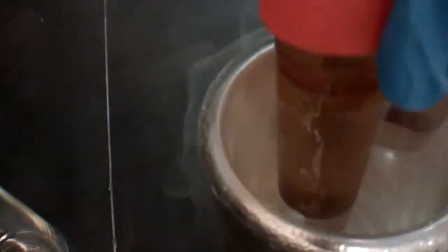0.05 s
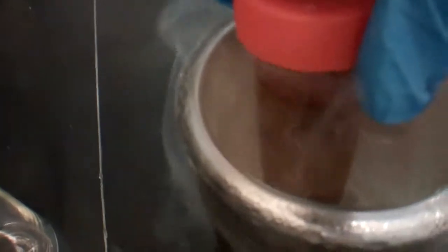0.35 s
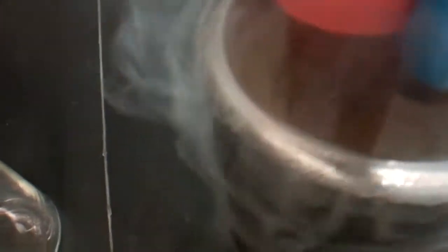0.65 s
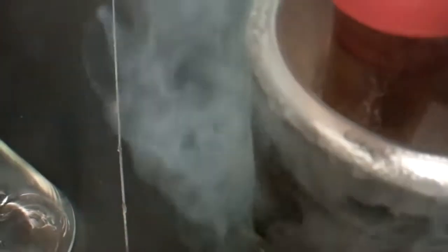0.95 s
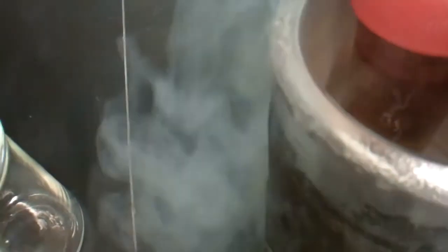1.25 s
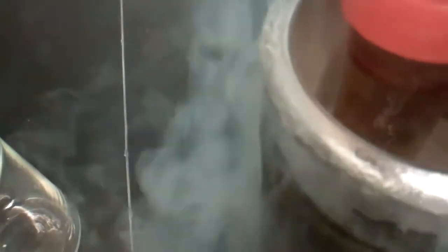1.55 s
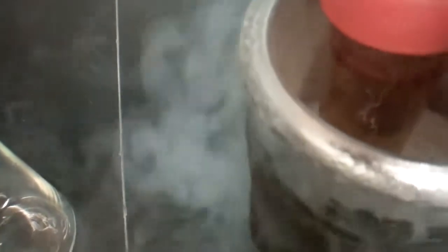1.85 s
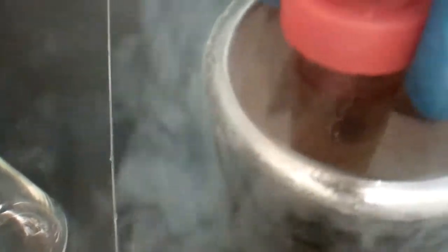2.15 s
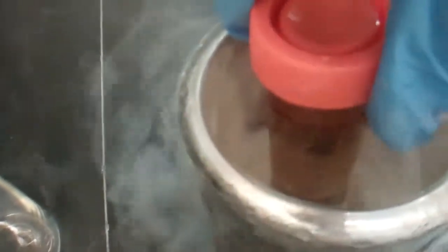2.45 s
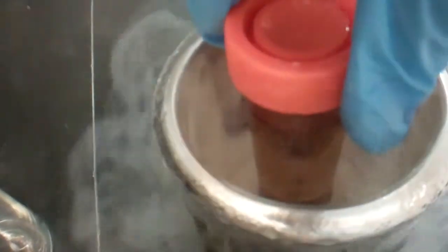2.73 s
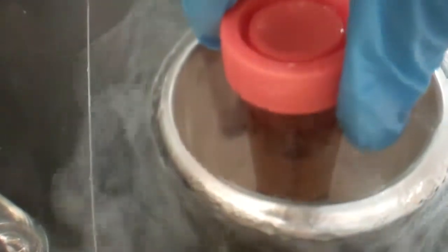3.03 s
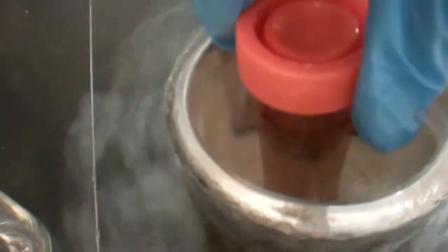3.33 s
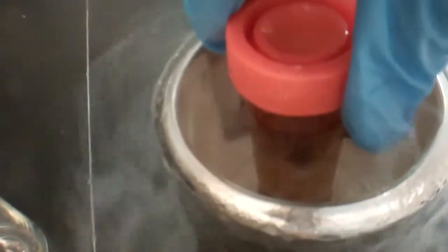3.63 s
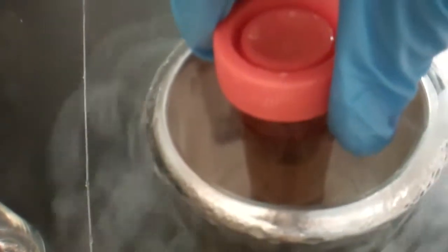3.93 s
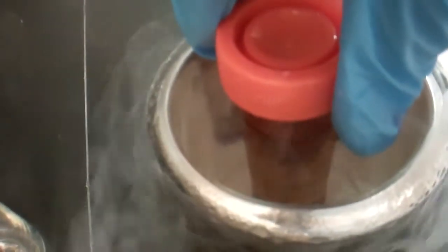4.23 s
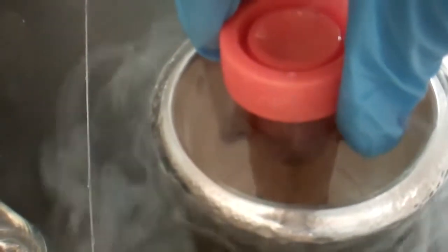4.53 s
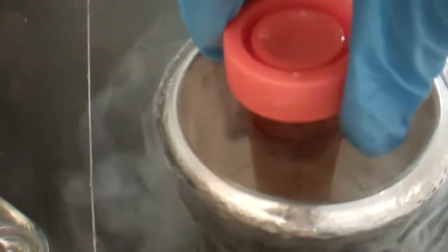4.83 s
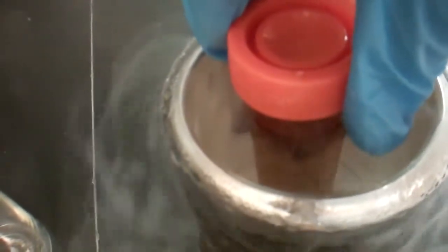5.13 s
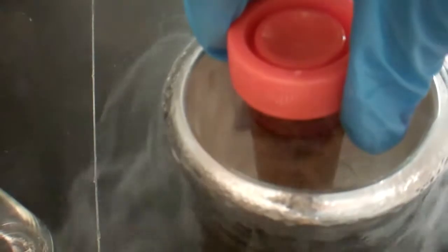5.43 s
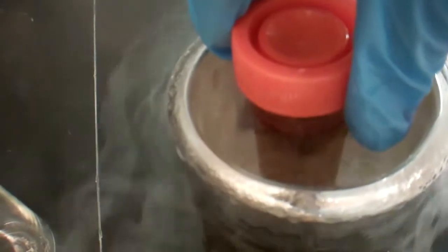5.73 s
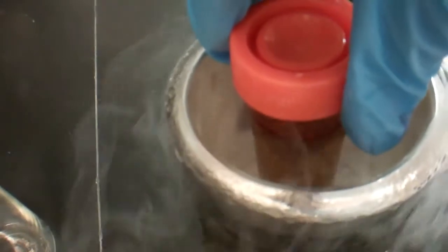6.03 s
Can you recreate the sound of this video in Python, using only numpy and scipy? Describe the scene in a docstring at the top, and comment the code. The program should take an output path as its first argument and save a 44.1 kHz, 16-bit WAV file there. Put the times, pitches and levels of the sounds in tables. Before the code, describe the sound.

Liquid nitrogen boils around a warm plastic tube in a steel flask, hissing, gurgling and spitting, then calming over a machine buzz.

```python
"""A machine buzzes at mains frequency over fan noise in a laboratory; the background drops almost at once. A
warm plastic tube enters a steel vacuum flask of liquid nitrogen and squeals thinly on contact. The liquid boils
against it: vapour rushes, sizzles, spits and sounds the flask's air column. The boiling calms as the tube
cools. After two seconds the background level comes back up, and a softer hiss goes on to the end."""
import sys
import numpy as np
from scipy.fft import rfft, irfft
from scipy.io import wavfile
from scipy.ndimage import uniform_filter1d

SR = 44100
rng = np.random.default_rng(int(sys.argv[2]) if len(sys.argv) > 2 else 0)


def dump(signal):
    """Clip the signal to [-1, 1] and save it as 16-bit WAV at the path in sys.argv[1]."""
    limited = np.clip(np.atleast_2d(signal).T, -1, 1)
    pcm = np.round(limited * 32767).astype(np.int16)
    wavfile.write(sys.argv[1], SR, pcm)


N = 272538
TIME, FREQS = np.arange(N) / SR, np.fft.rfftfreq(N, 1 / SR)
MAINS_HZ, CUTOFF_HZ = 59.9685, 14180
SPURT_SPRAY = 0.31   # share of a spurt's dB that goes to the fine spray only

# Direction of machine and fans. Each row: frequency in Hz, left minus right in dB.
ROOM_PAN = [(60, -7), (120, -6), (260, -5), (700, -6), (1300, -3), (2400, 3), (4400, -1.5), (9000, 0.5),
            (14000, 1.5)]


def from_db(db):
    """Decibels to gain."""
    return 10 ** (np.asarray(db) / 20)


def rms_one(x):
    """Scale to unit power."""
    return x / np.sqrt(np.mean(x ** 2) + 1e-20)


def in_time(rows):
    """Each value column of a time table, at every sample."""
    times_s, *columns = np.transpose(rows)
    return [np.interp(TIME, times_s, column) for column in columns]


def at_hz(points, hz):
    """Read a table on a log-frequency axis."""
    points_hz, values = np.transpose(points)
    return np.interp(np.log(hz + 1e-9), np.log(points_hz), values)


def ramp(start_s, length_s):
    """Linear rise from 0 to 1."""
    return np.clip((TIME - start_s) / length_s, 0, 1)


def swell(centre_s, half_s):
    """Gaussian rise to 1 and back."""
    return np.exp(-((TIME - centre_s) / half_s) ** 2)


def drift(rate_hz):
    """Random wander, mostly below rate_hz; rms 1."""
    size = 8192
    hz = np.fft.rfftfreq(size, N / SR / size)
    slow = irfft(rfft(rng.standard_normal(size)) / (1 + (hz / rate_hz) ** 2))
    return np.interp(np.arange(N) * size / N, np.arange(size), rms_one(slow))


def flutter(rate_hz, longest_s=0.36):
    """Drift without its slow swings; rms 1."""
    wander = drift(rate_hz)
    return rms_one(wander - uniform_filter1d(wander, int(longest_s * SR)))


def pan(left_db):
    """Left and right gains for a level difference."""
    gains = from_db(np.array([[.5], [-.5]]) * left_db)
    return gains / np.sqrt(np.mean(gains ** 2, axis=0))


def from_flask(x):
    """Mono to stereo, arriving slightly later on the left."""
    return np.array([np.roll(x, SR // 9000), x])


def resonance(hz, width_hz):
    """Response of one damped mode; peak 1."""
    return 1j * FREQS * width_hz / (hz ** 2 - FREQS ** 2 + 1j * FREQS * width_hz)


def noise(response):
    """Filtered stereo turbulence, both sides alike in the bass; rms 1."""
    # Diffuse room sound. Each row: frequency in Hz, left-right correlation.
    likeness = [(300, 0.92), (640, 1), (1400, 0), (3000, 0.2), (7000, 0)]
    alike = np.clip(at_hz(likeness, FREQS), -1, 1)
    mid, side = rfft(rng.standard_normal((2, N)))
    spectra = np.sqrt(1 + alike) * mid + np.sqrt(1 - alike) * side * [[1], [-1]]
    return rms_one(irfft(spectra * response, N))


def fans(air_db, waver_db, throb):
    """Air noise that whistles faintly and throbs with the mains, plus unsteady rotor tones."""
    # Air noise spectrum. Each row: frequency in Hz, relative density in dB.
    air_spectrum = [(20, -47), (60, -14), (130, -12.5), (200, -6), (260, 1), (330, -10), (410, -3),
                    (500, -15), (1150, -11), (1550, -17), (2400, -20), (5200, -16), (6400, -20.5),
                    (14000, -17.5)]
    # Narrow resonances in the hiss. Each row: centre in Hz, width in Hz, relative level in dB.
    whistle_modes = [(4380, 130, -25), (4950, 89, -21), (5350, 210, -19), (5860, 110, -16)]
    # Fan and motor tones. Each row: frequency in Hz, rms level in dB.
    rotor_tones = [(89, -58.5), (236.2, -53), (261.6, -63), (667.8, -47), (1191.2, -57.5)]
    whistles = sum(from_db(db) * np.abs(resonance(hz, width)) ** 2 for hz, width, db in whistle_modes)
    air = noise((from_db(at_hz(air_spectrum, FREQS)) + whistles) * pan(at_hz(ROOM_PAN, FREQS)))
    air *= 1 + throb * np.cos(2 * np.pi * MAINS_HZ * TIME)
    tones = np.zeros(N)
    for hz, db in rotor_tones:
        gain = from_db(db + waver_db * drift(2.1))
        tones += gain * np.sin(2 * np.pi * hz * TIME + 0.67 * drift(1.2))
    return from_db(air_db) * air + np.sqrt(2) * tones * pan(-3.0)


def buzz(scatter_db, waver_db, hum_db, rattle_db, in_step_below_hz=3400):
    """A machine knocks once per mains cycle; reflections scatter each harmonic's level and phase."""
    # Main harmonics, the upper ones raised by panel resonances.
    # Each row: multiple of the mains, level in dB re hum_db, left minus right in dB.
    hum = [(1, -63.5, -5), (2, -45.5, -6), (3, -45.5, -5), (4, -42.0, -5), (5, -57.5, -6), (6, -54.0, -3),
           (7, -55.0, -5), (8, -55.5, -3), (9, -50.5, -6), (10, -47.0, -6), (11, -54.5, -2),
           (12, -42.5, -5), (13, -54.5, -7), (14, -52.0, -4), (15, -50.0, -1), (16, -66.0, -5),
           (17, -49.0, -5), (18, -50.0, -1), (19, -54.0, -12), (20, -55.0, -9), (21, -49.0, -9),
           (22, -43.0, -8), (23, -62.0, 8), (24, -52.5, -3), (25, -50.5, -12), (26, -54.5, -6),
           (27, -59.5, -9), (35, -56.5, -7), (38, -55.0, -8), (53, -53.5, 12), (55, -54.5, 4),
           (61, -54.5, -12), (71, -50.0, -4), (72, -53.5, -3), (73, -51.0, -12), (77, -53.0, -7),
           (82, -52.0, -5), (89, -46.5, -5), (91, -42.5, 7), (92, -51.5, 10), (93, -52.0, -1),
           (95, -52.5, -2), (97, -51.0, -4), (154, -51.0, 4), (155, -52.0, 2), (166, -51.0, 2),
           (178, -48.0, -5), (207, -47.0, -4), (209, -47.5, -3), (210, -45.0, -1), (214, -48.0, -12),
           (223, -47.0, 8)]
    # Rattle spectrum. Each row: frequency in Hz, level per harmonic in dB re rattle_db.
    rattle = [(1700, -55), (2200, -65), (2700, -66.5), (3300, -63), (3850, -59), (4400, -55.5),
              (5000, -59.5), (5500, -49), (6300, -73), (7100, -59), (8200, -63.5), (9500, -56.5),
              (11300, -57), (12300, -47.5), (13200, -50), (13800, -64)]
    # Direct knock. Each row: frequency in Hz, amplitude ratio to its reflections.
    knock = [(120, 0.55), (540, 1.3), (1400, 1.32), (2000, 0.28)]
    hz = MAINS_HZ * np.arange(1, int(CUTOFF_HZ / MAINS_HZ) + 1)
    scatter = rms_one(from_db(scatter_db * np.clip(rng.standard_normal((2, len(hz))), -2, 1)))
    levels = from_db(at_hz(rattle, hz) + rattle_db) * scatter * pan(at_hz(ROOM_PAN, hz))
    for multiple, db, left_db in hum:
        levels[:, round(multiple) - 1] = from_db(db + hum_db) * pan(left_db)[:, 0]
    apart_rad = hz / in_step_below_hz * rng.standard_normal((2, len(hz)))
    reflections = np.exp(2j * np.pi * rng.random(len(hz)))
    phase_rad = np.angle(at_hz(knock, hz) + reflections) + apart_rad
    harmonics = np.pad(levels * np.exp(1j * phase_rad), ((0, 0), (1, 0)))
    size = 8192
    cycle = irfft(harmonics, size) * size / np.sqrt(2)
    turns = MAINS_HZ * TIME + .0003 * drift(2) + .0001 * drift(70)   # jitter roughens the top
    wave = np.array([np.interp(turns % 1, np.arange(size) / size, side) for side in cycle])
    return wave * from_db(waver_db * drift(7.9))


def blown(response, pitch_ratio, puff_db):
    """Turbulence puffs through a resonator, retuned by resampling; rms 1."""
    position = np.cumsum(pitch_ratio)
    air = np.array([np.interp(position, np.arange(N), side, period=N) for side in noise(response)])
    return rms_one(air * from_db(puff_db * flutter(51)))


def gulps(swell_s, ring_s):
    """Each pocket of gas swells the air column's lowest mode, which then rings out."""
    # Gas pockets. Each row: peak time in seconds, peak level in dB, pitch in Hz.
    pockets = [(.175, -48, 730), (.22, -36, 713), (.243, -33, 702), (.278, -42, 680), (.318, -32, 690),
               (.368, -28, 682), (.41, -29, 672), (.447, -35, 670), (.495, -29, 668), (.524, -39, 693),
               (.582, -38, 675), (.64, -31, 636), (.686, -37, 670), (.726, -33, 710), (.745, -31, 643),
               (.764, -38, 663), (.783, -35, 647), (.824, -41, 649), (.893, -36, 637), (.933, -32, 680),
               (1.341, -36, 670)]
    out, age_s = np.zeros(N), np.arange(-SR // 25, SR // 10) / SR
    envelope = np.where(age_s < 0, np.exp(-(age_s / swell_s) ** 2), np.exp(-np.abs(age_s) / ring_s))
    for s, db, hz in pockets:
        start = int((s + age_s[0]) * SR)
        out[start:start + len(age_s)] += from_db(db) * envelope * np.sin(2 * np.pi * hz * age_s)
    return out


def plops(response):
    """Large bubbles break and ring the air column dully."""
    # Large bubbles. Each row: start in seconds, peak level in dB.
    bubbles = [(.362, -26), (.686, -19), (.927, -17)]
    clicks = np.zeros(N)
    for s, peak_db in bubbles:
        clicks[int(s * SR)] = from_db(peak_db)
    return irfft(rfft(clicks) * response, N) / np.abs(irfft(response, N)).max()


def flask(rush_db, blow_db):
    """The flask rings as a stopped pipe: gulps sound its lowest mode, sputters its upper ones."""
    # Air column tuning as the tube moves in the cold gas.
    # Each row: time in seconds, lowest mode in Hz, pitch ratio of the upper modes.
    tuning = [(0, 750, 0.96), (.25, 705.5, 0.97), (.5, 671.5, 1.0), (.8, 658.8, 1.01), (1.15, 683.6, 1.03),
              (1.75, 675.6, 1.046), (2.4, 669.5, 1.0), (3.3, 657.2, 0.96), (6.18, 659.3, 0.98)]
    # Upper modes. Each row: centre in Hz at ratio 1, width in Hz, relative level in dB.
    modes = [(1905, 152, 1), (2680, 130, -3), (3226, 260, -4), (3514, 103, -4), (4924, 130, -4.5)]
    # Sputters. Each row: peak time in seconds, rise in dB.
    sputters = [(.207, 6), (.259, 6), (.606, 1), (.652, 4), (.688, 4), (.723, 4), (.742, 3), (.766, 6),
                (.833, 0), (1.21, 7.5), (1.342, 9.5), (1.829, 7)]
    low_hz, upper_ratio = in_time(tuning)
    rest_hz = np.mean(low_hz)
    lowest = resonance(rest_hz, 57) * resonance(rest_hz, 460)
    upper = sum(from_db(db) * resonance(hz, width) * resonance(hz, 4 * width) for hz, width, db in modes)
    hollow = from_db(blow_db) * blown(lowest, low_hz / rest_hz, puff_db=2.5)
    sputter_db = sum(db * swell(s, half_s=0.011) for s, db in sputters)
    overtone_db = (rush_db + blow_db) / 2 + sputter_db + 1.2
    overtones = from_db(overtone_db) * blown(upper, upper_ratio, puff_db=1.5)
    bubbling = gulps(swell_s=0.0048, ring_s=0.016) + plops(resonance(rest_hz, 480) + 0.39 * upper)
    return (hollow + bubbling) * pan(-9.0) + overtones * pan(-7.0)


def squeals(width_hz):
    """Vapour squeezes through the first thin film under the tube in a narrow, high sizzle."""
    # First contacts. Each row: peak time in seconds, rms level at the peak in dB, centre in Hz.
    contacts = [(.1, -36, 7950), (.138, -31, 7860), (.168, -35, 8050), (.248, -39, 8400)]
    return sum(from_db(db) * swell(s, half_s=0.012) * noise(resonance(hz, width_hz) ** 2)
               for s, db, hz in contacts)


def spits(decay_cycles):
    """A bursting droplet snaps and dies within a few cycles."""
    # Loud droplets. Each row: start in seconds, peak level in dB, pitch in Hz.
    droplets = [(.1642, -19, 4500), (.1787, -19, 4500), (.2455, -17, 6900), (.689, -18, 3500),
                (.9487, -18, 11000), (1.0195, -19, 4500), (1.1492, -17, 11000), (1.296, -11, 13000),
                (1.3846, -16, 5500), (1.4488, -10, 13000), (1.5913, -14, 12500), (1.6445, -15, 12500),
                (1.6591, -16, 12500), (1.7425, -7, 4500), (1.8632, -16, 12000), (1.9865, -14, 10600)]
    out, age_s = np.zeros(N), np.arange(SR // 100) / SR
    for s, db, hz in droplets:
        start = int(s * SR)
        snap = np.cos(2 * np.pi * hz * age_s) * np.exp(-hz * age_s / decay_cycles)
        out[start:start + len(age_s)] += from_db(db) * snap
    return from_flask(out)


def spurts_db():
    """The boiling briefly spurts (+) or falters (-)."""
    # Each row: peak time in seconds, change in dB, half length in seconds.
    spurts = [(0.056, 4, .014), (.215, -2.5, .021), (0.328, -5, .015), (0.407, 2, .0062), (0.46, 2, .011),
              (0.48, -2, .008), (.525, 3.5, 0.02), (1.02, 0.5, .029), (1.071, -2, 0.013), (1.18, -5, .023),
              (1.29, 2, .011), (1.335, -3.5, .013), (1.447, 1, 0.0079), (1.557, -1.5, 0.025),
              (1.65, -3, .028), (2.123, 0.5, .03), (2.195, -3, .025), (2.255, -1, .014), (2.783, 3.5, .016),
              (2.825, -8, 0.022), (3.09, -4, .018), (3.205, 0, .018), (3.254, 1, .012), (3.5, -3.5, .03),
              (3.907, 2, 0.032), (4.251, 2, 0.027), (4.52, 2, 0.027), (4.757, 1, .037), (5.906, 5, 0.017)]
    return sum(db * swell(s, half_s) for s, db, half_s in spurts)


def vapour_levels(room_db, cold_rush_db=-4, warm_boost_db=8, cools_from_s=0.56, cooling_s=0.56):
    """Levels in dB of rush, sizzle and neck flow; a warm tube drives the rush harder."""
    # Vigour of the boiling. Each row: time in seconds, base level of the sizzle in dB.
    vigour = [(0, -47), (.05, -31.5), (.33, -31), (.46, -30.5), (.8, -30.5), (1.4, -28.5), (2.0, -31.5),
              (2.45, -31), (2.62, -32.5), (3.05, -31), (3.62, -31.5), (3.78, -35.5), (6.18, -37)]
    sizzle_db = in_time(vigour)[0] + (1 - SPURT_SPRAY) * spurts_db()
    immersion = ramp(0.01, 0.17)
    warmth = immersion * np.exp(-np.maximum(TIME - cools_from_s, 0) / cooling_s)
    rush_db = sizzle_db + cold_rush_db + warm_boost_db * warmth
    rush_db += 0.33 * room_db   # dips a little with the background
    # The first burst of vapour roars through the neck.
    roar_on, roar_off = ramp(0.096, 0.22), ramp(0.91, 0.15)
    roar_db = -15 * (1 - roar_on) + 5 * (roar_on - roar_off)
    blow_db = -50.5 + 0.47 * (rush_db - rush_db.mean()) + roar_db
    return rush_db, sizzle_db, blow_db


def bursting(spectrum, per_s, spread_db, grain_db, flutter_db, flutter_hz):
    """Tiny bubbles burst over a smooth jet of vapour, in uneven surges; rms 1."""
    response = from_db(at_hz(spectrum, FREQS))
    sizes = from_db(spread_db * np.minimum(rng.exponential(1, N), 4)) * rng.choice([-1, 1], N)
    bursts = from_flask(sizes * (rng.random(N) < per_s / SR))
    grains = rms_one(irfft(rfft(bursts) * response, N))
    hiss = rfft(noise(response) + from_db(grain_db) * grains)
    # Each band of bubble sizes flutters on its own; spurts stir the finest most.
    centres_hz = np.linspace(0, CUTOFF_HZ, 7)
    spray_db = SPURT_SPRAY * spurts_db()
    out = np.zeros((2, N))
    for hz, weights in zip(centres_hz, np.eye(len(centres_hz))):
        band = irfft(hiss * np.interp(FREQS, centres_hz, weights), N)
        out += band * from_db(flutter_db * flutter(flutter_hz) + spray_db * (hz / CUTOFF_HZ) ** 2)
    return rms_one(out)


def boiling(rush_db, sizzle_db):
    """A film of vapour hisses around the tube and throws off droplets."""
    # Spectra of vapour rush and fine sizzle. Each row: frequency in Hz, relative density in dB.
    rush_spectrum = [(60, -26), (400, -21), (950, -7.5), (1450, -13), (2300, -7), (3050, -2.5),
                     (4200, -1.5), (4900, -0.5), (6500, -1), (9000, -9.5), (14000, -21), (15000, -50)]
    sizzle_spectrum = [(1000, -43), (3000, -37), (6500, -15.5), (8500, -8.5), (10500, -6), (12500, -3),
                       (14200, 2.5), (15000, -53)]
    rush = from_db(rush_db) * bursting(
        rush_spectrum, per_s=3000, spread_db=6.5, grain_db=-6, flutter_db=2.45, flutter_hz=37)
    sizzle = from_db(sizzle_db + 1.0) * bursting(
        sizzle_spectrum, per_s=4500, spread_db=-0.5, grain_db=-5.5, flutter_db=2.5, flutter_hz=86)
    accents = spits(decay_cycles=1.4) + squeals(width_hz=1000)
    return rush * pan(-2.6) + sizzle * pan(-7.5) + accents * pan(-9.0)


def scene():
    """The flask close by on the right, machine and fans behind it."""
    # Background: abrupt dip, slow return. Each row: time in seconds, gain in dB.
    room_level = [(.048, 0), (.075, -10.5), (.85, -10), (1.12, -12.5), (1.65, -10.5), (2.19, -8),
                  (2.34, -3.5), (2.5, -3.5), (2.64, 0.5), (2.97, 0.5), (3.1, -1.5), (3.5, 0.5)]
    room_db, = in_time(room_level)
    rush_db, sizzle_db, blow_db = vapour_levels(room_db)
    room = buzz(scatter_db=7.0, waver_db=0.7, hum_db=-0.83, rattle_db=-2.0)
    room += fans(air_db=-34.0, waver_db=1.0, throb=0.16)
    return from_db(room_db) * room + boiling(rush_db, sizzle_db) + flask(rush_db, blow_db)


def record(dry):
    """Steep low-pass at CUTOFF_HZ."""
    return irfft(rfft(dry) / np.sqrt(1 + (FREQS / CUTOFF_HZ) ** 600), N)


dry = scene()
out = record(dry)
dump(out)
```